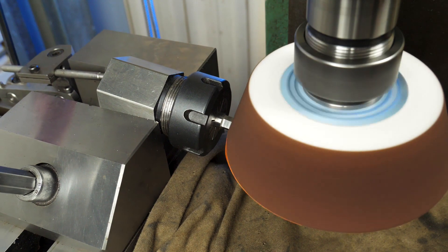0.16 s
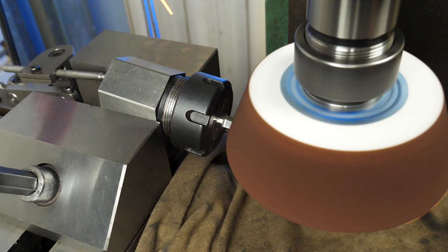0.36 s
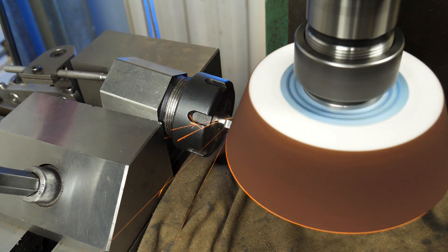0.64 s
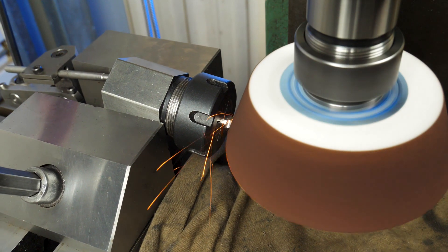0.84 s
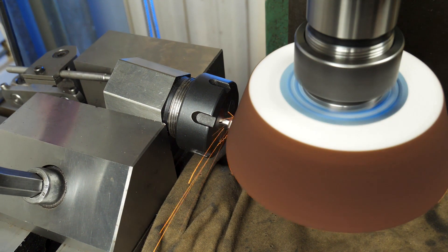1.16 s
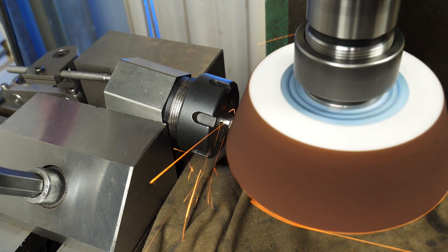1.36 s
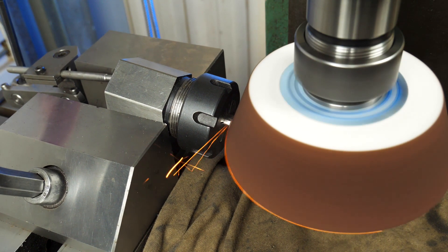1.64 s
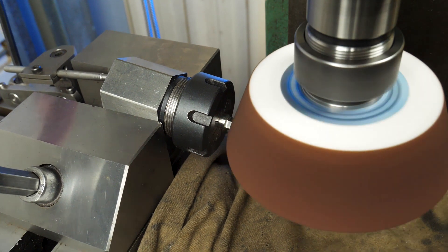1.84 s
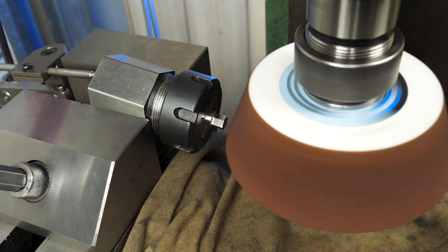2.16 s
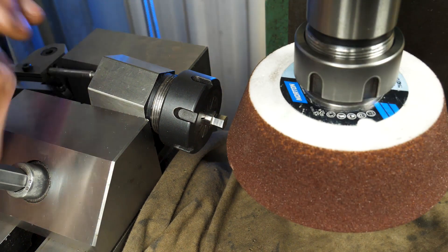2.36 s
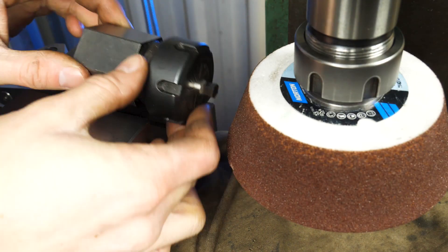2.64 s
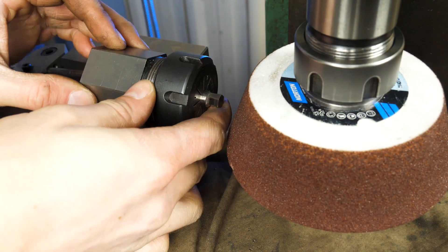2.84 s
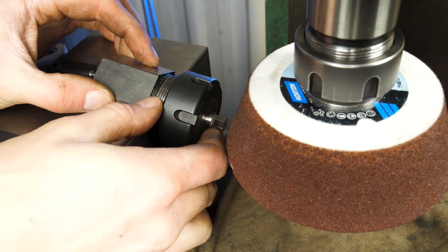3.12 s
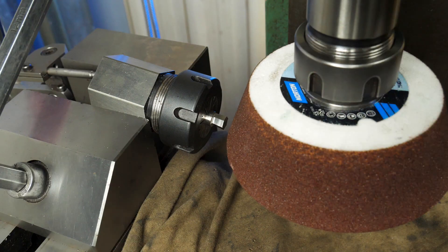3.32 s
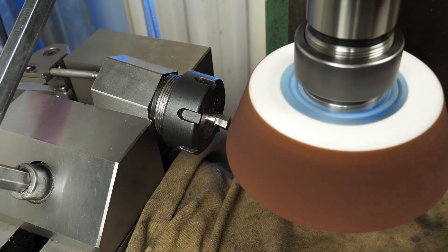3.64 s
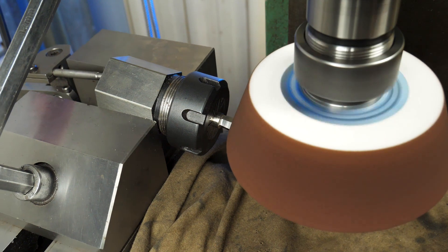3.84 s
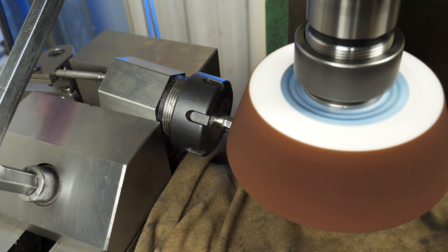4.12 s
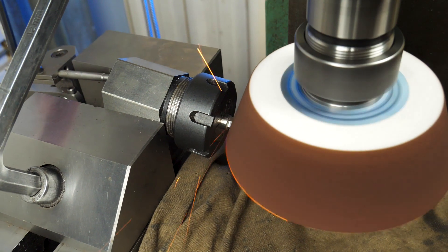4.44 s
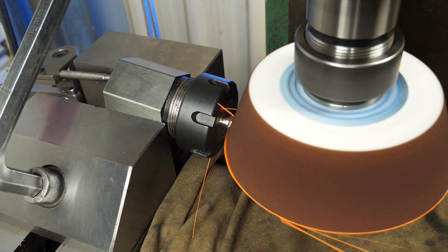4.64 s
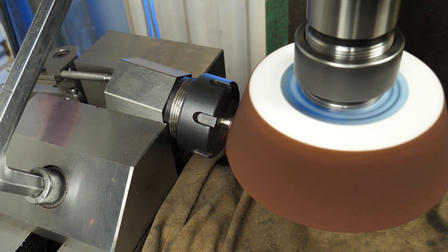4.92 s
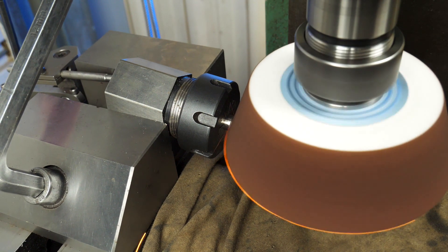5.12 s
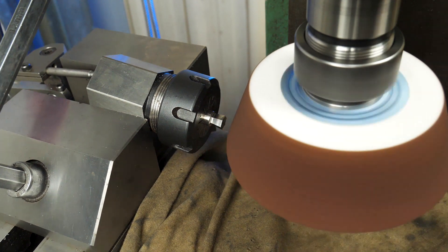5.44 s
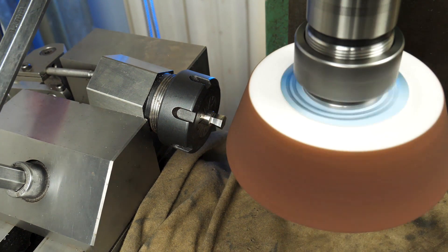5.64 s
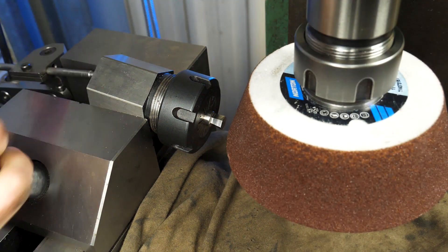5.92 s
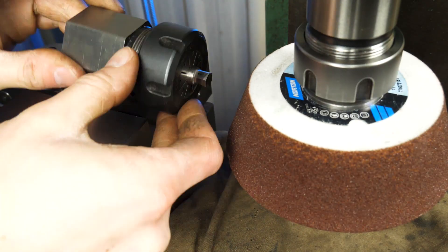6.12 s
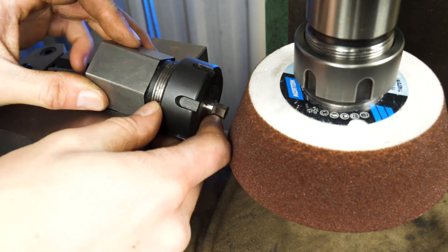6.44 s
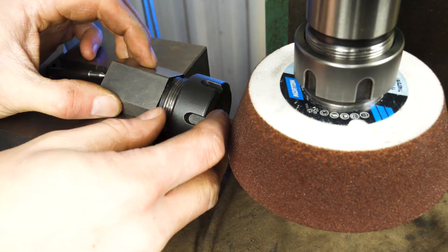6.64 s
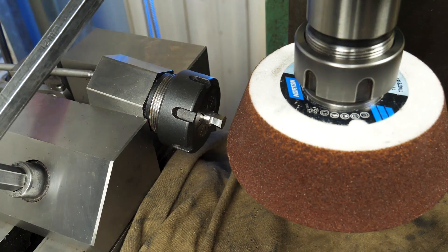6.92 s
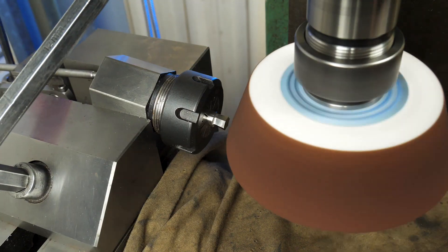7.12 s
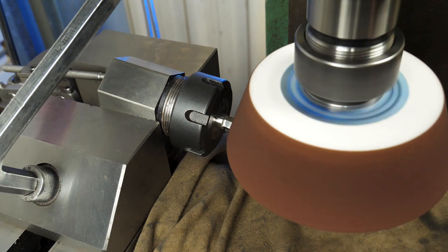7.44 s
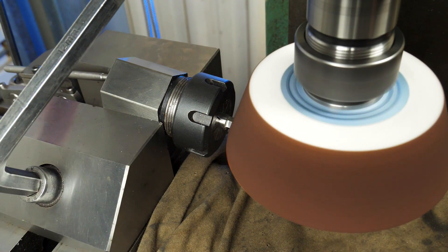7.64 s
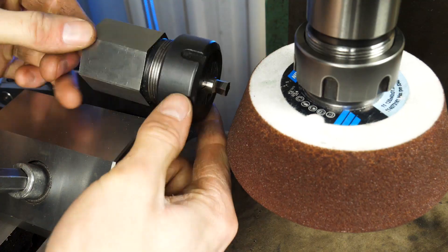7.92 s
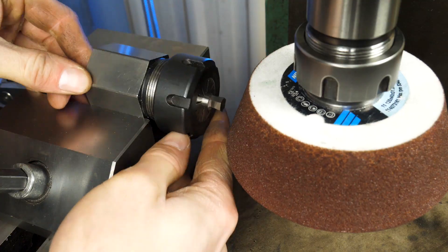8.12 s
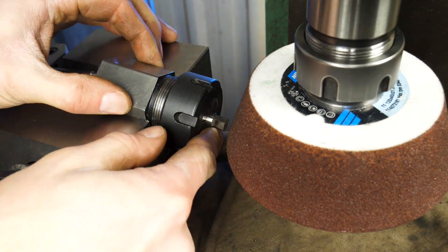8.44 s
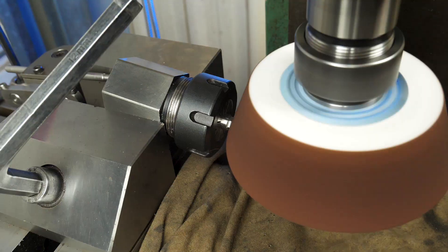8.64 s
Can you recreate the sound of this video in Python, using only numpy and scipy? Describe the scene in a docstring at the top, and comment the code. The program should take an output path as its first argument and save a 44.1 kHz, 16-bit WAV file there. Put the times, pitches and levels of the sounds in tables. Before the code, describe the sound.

A grinding wheel rushes and whines in four abruptly cut passes, running down with falling whistles, between quiet taps and scrapes of a steel block.

```python
"""Four passes of a cup wheel grinding a small steel bit, joined by splices; only the first is stereo.
From the start the wheel rushes as filtered noise, and gearbox and bearings whine as fluttering lines.
Heavy parts clunk (filtered noise bursts); late in passes one and two the spindle runs down, whistling.
After each of the first three passes hands turn a steel block and seat it in the vise: rough contact
forces tap, slide and ring the steel. Passes three and four are short; a quiet shop lies under it all."""
import sys
import numpy as np
from scipy import signal
from scipy.fft import rfft, irfft, next_fast_len
from scipy.io import wavfile
from scipy.ndimage import uniform_filter1d

SR = 44100
rng = np.random.default_rng(int(sys.argv[2]) if len(sys.argv) > 2 else 0)


def generate_wav(signal):
    """Clip the signal to [-1, 1] and save it as 16-bit WAV at the path in sys.argv[1]."""
    frames = np.transpose(np.atleast_2d(signal))
    scaled = np.clip(frames, -1, 1) * 32767
    pcm = np.round(scaled).astype(np.int16)
    wavfile.write(sys.argv[1], SR, pcm)


N = 386757
TIME = np.arange(N) / SR

# Grinding passes. Each row: start in seconds, end in seconds, fade-in in seconds, level in dB.
PASSES = [(-.005, 2.39, .004, -.2), (3.446, 5.874, .015, 0), (6.993, 7.913, .008, -.5),
          (8.552, 8.794, .001, .2)]
# Rush of the wheel before the resonances. Each row: frequency in Hz, then density in dB per Hz for
# the later passes, the mid of the first pass and the side of the first pass.
RUSH_SPECTRUM = [(40.0, -101.5, -74.5, -100.0), (130.0, -98.5, -87.5, -97), (290.0, -96.5, -82.5, -94),
                 (450.0, -90, -90, -89.5), (1100.0, -84, -86.5, -81), (1800.0, -79.5, -81, -82.5),
                 (2710, -82, -84, -83), (3500.0, -82.0, -82.5, -83.5), (5130, -77.5, -78, -79.5),
                 (7600, -76.0, -81.5, -76.5), (10100, -76.5, -79.0, -79.0), (13500, -79.5, -79.0, -82),
                 (14300.0, -73.0, -78, -73), (15500.0, -72.5, -75, -84)]
# Resonances of wheel, spindle head and vise. Each row: centre in Hz, width in Hz, lift in dB.
BODY_RESONANCES = [(540, 50, 4), (946, 73, 4.5), (1272, 39, 7), (1561, 35, 6), (2067, 55, 5),
                   (3000, 106, 3), (3925, 167, 5), (4690, 75, 2), (5890, 220, 3.5), (6410, 110, 4),
                   (7848, 200, 1.5), (8640, 230, 2), (11400, 500, 2)]
# Gear mesh, its shaft sidebands and bearing whine. Each row: frequency in Hz in the later passes,
# level in dB there, left and right level in dB in the first pass, roughness from 0 to 1.
WHINE_LINES = [(168, -72.5, -61, -65, .6), (184, -71, -73, -74, .5), (372, -67, -71, -67, .5),
               (505, -62.5, -58, -63, .6), (642, -61, -59, -60, .4), (702, -65.5, -66, -66, .4),
               (794, -47.5, -34.5, -47, .05), (841, -67, -61, -65, .4), (886, -62, -57, -60, .4),
               (978, -55.5, -53, -56, .5), (1314, -60.5, -56, -61, .9), (1497, -62, -68, -66, .4),
               (1541, -60.5, -59, -65, .6), (1588, -57, -50, -57, .3), (1771, -62, -59, -63, .4),
               (2048, -62, -60, -61, .9), (3149, -50.5, -57, -51, .2), (3176, -56, -55, -57, .2),
               (3943, -58, -57, -60, .8), (5038, -59.5, -56, -58, .4), (5960, -51, -46.5, -48, 1),
               (6302, -46.5, -52, -47, .6), (7096, -65, -48, -67, .3), (7870, -57, -60, -59, .9)]
# Feeding the bit. Each row: time of firmest pressure in seconds, half length in seconds,
# damping of the wheel in dB.
FEEDS = [(.9, .55, 3), (4.6, .4, 4), (7.95, .25, 2), (8.7, .3, 2)]
# Times in seconds at which the drive is switched off.
SWITCH_OFF_S = [2.125, 5.628]
# Run-down whistles before resonance and fade. Each row: frequency in Hz at full speed, level in dB.
WHISTLES = [(4800, -52), (3250, -53)]
# Times in seconds at which the drive takes hold.
ENGAGE_S = [3.466, 7.006]
# Dull clunks of heavy parts. Each row: time in seconds, level in dB, pitch in Hz, decay in seconds.
CLUNKS = [(.145, -44, 1100, .025), (.248, -38.5, 1050, .026), (.275, -42, 375, .065),
          (.855, -35, 950, .019), (1.65, -41, 1300, .009), (1.94, -42.5, 280, .06),
          (1.952, -27.5, 1000, .0065), (1.974, -36.5, 1000, .009), (2.191, -35.5, 1150, .005),
          (2.481, -45, 500, .0015), (2.545, -61, 450, .014), (3.616, -48, 376, .028),
          (5.964, -61, 500, .005), (6.552, -56, 700, .011)]
# Block taps the vise. Each row: time in seconds, level in dB, brightness in dB per octave.
TAPS = [(2.5636, -45.5, 5.5), (2.8569, -49, 0), (2.8782, -43.5, 1.3), (2.9655, -40.5, 1), (3.0021, -45, 3),
        (3.0604, -44.5, 1.5), (3.388, -52, -1), (6.042, -42.5, 6), (6.1424, -51.5, 1.5),
        (6.3884, -55.5, -4.5), (6.5482, -48, -1.3), (6.572, -52.5, -1.5), (6.6155, -43, 4.5),
        (6.777, -62, -2), (8.0836, -59, -3.5), (8.1209, -60, -2), (8.1544, -58, -4), (8.1994, -59, 0),
        (8.3927, -54, -.5)]
# Block slides on the jaws. Each row: time in seconds, length in seconds, level in dB.
SLIDES = [(2.667, .032, -63), (3.055, .008, -55), (5.847, .026, -65), (6.118, .026, -56.5),
          (6.3768, .012, -64), (6.509, .04, -60), (7.916, .018, -57), (8.339, .015, -54.5),
          (8.373, .018, -55), (8.528, .022, -61.5)]
# Steel-on-steel contact spectrum. Each row: frequency in Hz, relative level in dB per Hz.
CONTACT_SPECTRUM = [(100, -11.5), (300, -12.5), (1000, -5.5), (1600, -5.5), (3300, -4), (6000, -1),
                    (9500, -1.5), (13000, -2), (16000, -9)]
# Ringing of block and vise. Each row: frequency in Hz, relative level in dB, t60 in seconds.
STEEL_MODES = [(520, -3.5, .08), (980, 0, .06), (1306, -3, .06), (2030, -2.5, 0.083), (2900, -7, 0.034),
               (3575, -10.5, .04), (4334, -8.5, 0.044), (5739, -4, .02), (7585, -13, .04), (8775, -7, .04)]
# Spans in which hands shift the block. Each row: start in seconds, end in seconds.
FIDDLING = [(2.43, 2.7), (2.88, 3.39), (5.91, 6.92), (7.92, 8.4)]
# Workshop background. Each row: frequency in Hz, mean density in dB per Hz.
SHOP_SPECTRUM = [(25, -100), (60, -110), (130, -114), (280, -109), (900, -112), (1800, -118), (5000, -124),
                 (9500, -122), (12500, -128), (14000, -136), (16000, -140)]
# Rumble and faint hiss of the first pass before a small gain. Each row: frequency in Hz,
# density in dB per Hz.
RUMBLE_SPECTRUM = [(15, -70.5), (40, -74), (70, -81), (130, -83.5), (320, -87.5), (500, -88), (1200, -102),
                   (6000, -108), (16000, -112)]
# Splice thumps, each after a short silence. Each row: time in seconds, level in dB.
SPLICES = [(2.429, -35.5), (3.429, -45.5), (5.909, -36), (6.989, -45)]

BRAKE_S, LOUDNESS_POWER = .18, 1.85  # time to standstill; amplitude goes as speed to this power
FREE_RING_DB = 1  # wheel's middle range with nothing pressed on it
LINGER_HZ, LINGER_DB, LINGER_T60_S = 794, -67, 1.1  # gear tone after switch-off
ENGAGE_DB, RELEASE_DB, DRIVE_HZ, DRIVE_DECAY_S = -33, -46, 760, .012
CLUNK_RISE = .6  # build-up as a share of the decay
BREAKAWAY, BREAKAWAY_S = 1, .003  # extra force at the start of a slide, and its decay
SOFT_BRIGHTNESS_DB_PER_OCTAVE = -3.5  # slides, ticks and rustle
TICKS_PER_S, TICK_DB, TICK_SPREAD_DB = 4, -70, 2
RUSTLE_DB, RUSTLE_SWELL_DB, RUSTLE_RATE_HZ = -114, 2.5, 9  # gain on the contact spectrum; its swells
SILENCE_S, EDGE_HZ = .032, 15900  # gap before each splice; band limit


def amp(db):
    """Decibels to gain."""
    return 10 ** (np.asarray(db) / 20)


def evened(x):
    """Scales to rms 1."""
    return x / np.sqrt(np.mean(x ** 2) + 1e-20)


def read(points, hz, column=1):
    """Reads a spectrum on a log-frequency axis."""
    points = np.asarray(points)
    return np.interp(np.log(hz + 1), np.log(points[:, 0] + 1), points[:, column])


def add(mix, start_s, sound):
    """Lays a sound into the mix at a time."""
    part = mix[max(round(start_s * SR), 0):][:len(sound)]
    part += sound[:len(part)]


def bins(size):
    """Frequencies in Hz of a spectrum of so many samples."""
    return np.fft.rfftfreq(size, 1 / SR)


def noise(density_db):
    """Noise with a spectrum given as a function, in dB per Hz."""
    size = next_fast_len(N, True)
    spectrum = rfft(rng.standard_normal(size)) * amp(density_db(bins(size)))
    return irfft(spectrum, size)[:N] * np.sqrt(SR / 2)


def wander(rate_hz):
    """Random curve of rms 1, straight between random points, changing at about the given rate."""
    values = rng.standard_normal(8000)
    return evened(np.interp(TIME * 2 * rate_hz, np.arange(len(values)), values))


def machine(ring_hz=1700, ring_octaves=.45, treble_hz=9000, dulling=.5):
    """Rush and whine, gated by passes; slowing fades and dulls them, feeding damps the middle range."""
    first = TIME < PASSES[0][1]
    mid, side = rush(column=2), rush(column=3)
    stereo = np.array([mid + side, mid - side])
    sound = np.where(first, stereo, rush(column=1)) + whine(first)

    size = next_fast_len(N, True)
    hz, spectrum = bins(size), rfft(sound, size)
    middle_band = np.exp(-.5 * (np.log2((hz + 1) / ring_hz) / ring_octaves) ** 2)
    middle = irfft(spectrum * middle_band, size)[:, :N]
    treble = irfft(spectrum * hz ** 4 / (hz ** 4 + treble_hz ** 4), size)[:, :N]

    damping_db = sum(db * np.exp(-((TIME - s) / half_s) ** 2) for s, half_s, db in FEEDS)
    ring_gain = amp(FREE_RING_DB - damping_db)
    sound = sound + middle * (ring_gain - 1) + treble * (speed() ** dulling - 1)
    gate = np.zeros(N)
    for start_s, end_s, fade_s, db in PASSES:
        gate += amp(db) * np.clip((TIME - start_s) / fade_s, 0, 1) * (TIME < end_s)
    return sound * gate * speed() ** LOUDNESS_POWER


def rush(column, ripple_db=2.62, ripple_hz=22, flutter_db=0.7):
    """Air and grit hiss through the broad resonances and the many small modes of the machine."""
    grid_hz = np.arange(0, SR / 2, 8)
    ripple = np.interp(grid_hz / ripple_hz, np.arange(len(grid_hz)), rng.standard_normal(len(grid_hz)))
    colour_db = read(RUSH_SPECTRUM, grid_hz, column) + body_db(grid_hz) + ripple_db * ripple
    return noise(lambda hz: np.interp(hz, grid_hz, colour_db)) * amp(flutter_db * wander(25))


def whine(first, drift=0.00048, first_faster=.002, port_phase_rad=2.54, stop_s=0.0064, coast_db=-14):
    """Lines share one speed drift; rough ones flutter and widen; all drop when the drive lets go."""
    turns = np.cumsum(1 + first_faster * first + drift * wander(8)) / SR
    driven = np.maximum(np.exp(-coasting() / stop_s), amp(coast_db))
    out, split = np.zeros((2, N)), first.sum()
    for hz, later_db, left_db, right_db, rough in WHINE_LINES:
        rate_hz = 12 + hz * .003
        cycles = hz * turns + rng.random()
        angle = (2 * np.pi * (cycles - np.floor(cycles))).astype("float32")
        steady = 1 + rough * wander(rate_hz)
        across = rough * wander(rate_hz)
        size = np.sqrt(2 / (1 + 2 * rough ** 2))
        line = size * (steady * np.cos(angle) + across * np.sin(angle))
        # the two ports of the stereo microphone hear all but the lowest lines out of step
        late = angle[:split] - float(port_phase_rad * min(hz / 750, 1))
        late_line = size * (steady[:split] * np.cos(late) + across[:split] * np.sin(late))
        out[0, :split] += amp(left_db) * line[:split]
        out[1, :split] += amp(right_db) * late_line
        out[:, split:] += amp(later_db) * line[split:]
    return out * driven


def body_db(hz):
    """Lift that the resonances of the machine give to a frequency."""
    return sum(db * np.exp(-.5 * ((hz - centre_hz) / width_hz) ** 2)
               for centre_hz, width_hz, db in BODY_RESONANCES)


def coasting():
    """Seconds since switch-off, until the pass ends; zero otherwise."""
    since_s = np.zeros(N)
    for start_s, end_s, _, _ in PASSES:
        for off_s in SWITCH_OFF_S:
            if start_s < off_s < end_s:
                since_s += (TIME - off_s) * ((TIME > off_s) & (TIME < end_s))
    return since_s


def speed():
    """Spindle speed as a share of full speed; the brake takes it down at an even rate."""
    return np.clip(1 - coasting() / BRAKE_S, 0, 1)


def run_down(rough=.065, flutter_db=4.5, fade_power=1.5, lowest_hz=1100, onset_s=.012, first_db=-7):
    """Ragged whistles fall with speed, swell at resonances, die near a lowest pitch; gear tone lingers."""
    since_s, share = coasting(), speed()
    out = amp(LINGER_DB - 60 * since_s / LINGER_T60_S) * np.sin(2 * np.pi * LINGER_HZ * TIME)
    for full_hz, db in WHISTLES:
        hz = full_hz * share
        turns = np.cumsum(hz * (1 + rough * wander(396))) / SR
        fade = share ** fade_power * hz ** 8 / (hz ** 8 + lowest_hz ** 8)
        level = amp(db + body_db(hz) + flutter_db * wander(60))
        out += level * fade * np.sin(2 * np.pi * turns)
    onset = np.minimum(since_s / onset_s, 1)
    return np.sqrt(2) * out * onset * amp(first_db * (TIME < PASSES[0][1]))


def clunks(octaves=.55, skirt_db=-14, grain_db=3.5):
    """Short dull noise rattles of heavy parts and of the drive, each centred on one pitch."""
    out, t = np.zeros(N), np.arange(16384) / SR - .12
    engage = [(s, ENGAGE_DB, DRIVE_HZ, DRIVE_DECAY_S) for s in ENGAGE_S]
    release = [(s, RELEASE_DB, DRIVE_HZ, DRIVE_DECAY_S) for s in SWITCH_OFF_S]
    for s, db, hz, decay_s in engage + release + list(CLUNKS):
        distance = np.log2((bins(len(t)) + 1) / hz)
        colour = np.exp(-.5 * (distance / octaves) ** 2) + amp(skirt_db) / (1 + (distance / 2) ** 4)
        shape = np.exp(np.where(t < 0, t / CLUNK_RISE, -t) / decay_s)
        grain = amp(grain_db * evened(uniform_filter1d(rng.standard_normal(len(t)), size=90)))
        rattle = irfft(rfft(rng.standard_normal(len(t)) * grain) * colour)
        add(out, s + t[0], amp(db) * evened(rattle * shape) * np.sqrt(np.mean(shape ** 2)))
    return out


def handling(snap_s=0.00081, chatter_s=0.0048, chatter=.35, graze=.06, graze_s=.003, stick_db=3.5):
    """Slides break away into a run of tiny slips; taps graze, snap and chatter briefly."""
    out, lead_s = np.zeros(N), .005
    t = np.arange(8192) / SR - lead_s
    age = abs(t)
    for s, length_s, db in SLIDES:
        touching = (t > 0) & (t < length_s)
        slips = amp(stick_db * evened(uniform_filter1d(rng.standard_normal(len(t)), size=60)))
        force = touching * (slips + BREAKAWAY * np.exp(-age / BREAKAWAY_S))
        slide = contact(force, SOFT_BRIGHTNESS_DB_PER_OCTAVE)
        add(out, s - lead_s, amp(db) * slide / slide[touching].std())

    struck = np.exp(-age / snap_s) + chatter * np.exp(-age / chatter_s)
    force = np.where(t > 0, struck, graze * np.exp(-age / graze_s))
    for s, db, brightness_db in list(TAPS) + ticks():
        tap = contact(force, brightness_db)
        strike = tap[(t > 0) & (t < .01)]
        add(out, s - lead_s, amp(db) * tap / strike.std())
    return out


def contact(force, brightness_db, ring_db=-13, room_db=-18, room_t60_s=0.16, room_hz=7000,
            glance_db=1.3, spot_db=2.5, top_hz=11000):
    """A rough contact force cracks, rings the steel and stirs a little of the room."""
    t, hz = np.arange(len(force)) / SR, bins(len(force))
    tilt = amp(brightness_db * np.log2(np.clip(hz, 1000, top_hz) / top_hz))
    # each spot that is struck favours other resonances
    spot = amp(spot_db * np.interp(hz, np.linspace(0, SR / 2, 64), rng.standard_normal(64)))
    grit = evened(force * rng.standard_normal(len(t)))
    modes = sum(amp(db - 60 * t / t60_s) * np.sin(2 * np.pi * (mode_hz * t + rng.random()))
                for mode_hz, db, t60_s in STEEL_MODES)
    ring = evened(signal.fftconvolve(grit, modes)[:len(t)])
    room = evened(rng.standard_normal(len(t)) * amp(-60 * t / room_t60_s) * np.cumsum(force))
    heard = rfft(grit) + amp(room_db) * rfft(room) / np.hypot(1, hz / room_hz)
    crack = evened(irfft(heard * spot * tilt * amp(read(CONTACT_SPECTRUM, hz))))
    # a bright, glancing tap rings the steel less than a dull, square one
    return crack + amp(ring_db - glance_db * max(brightness_db, 0)) * ring


def ticks():
    """Faint taps, loosely spread over the time that the hands are busy: rows like those of TAPS."""
    rows = []
    for start_s, end_s in FIDDLING:
        for slot_s in np.arange(start_s, end_s, 1 / TICKS_PER_S):
            s = min(slot_s + rng.random() / TICKS_PER_S, end_s)
            db = TICK_DB + TICK_SPREAD_DB * rng.uniform(-1, 1)
            rows.append((s, db, SOFT_BRIGHTNESS_DB_PER_OCTAVE))
    return rows


def rustle(corner_hz=1500, edge_s=.03):
    """Fingers rub softly over the steel: dulled contact noise in uneven swells."""
    busy = sum(np.clip(np.minimum(TIME - start_s, end_s - TIME) / edge_s + 1, 0, 1)
               for start_s, end_s in FIDDLING)

    def rub_db(hz):
        """Contact spectrum, tilted above the corner."""
        octaves = np.log2(np.maximum(hz / corner_hz, 1))
        return read(CONTACT_SPECTRUM, hz) + SOFT_BRIGHTNESS_DB_PER_OCTAVE * octaves

    return noise(rub_db) * busy * amp(RUSTLE_DB + RUSTLE_SWELL_DB * wander(RUSTLE_RATE_HZ))


def background():
    """Quiet shop noise of wandering level, and a low rumble during the first pass."""
    shop = noise(lambda hz: read(SHOP_SPECTRUM, hz)) * amp(1.0 * wander(7.7))
    rumble = noise(lambda hz: read(RUMBLE_SPECTRUM, hz)) * (TIME < PASSES[0][1]) * amp(0.5)
    return shop + rumble


def scene():
    """The machine, with everything else in the centre."""
    return machine() + background() + run_down() + rustle() + clunks() + handling()


def record(dry, settle_s=0.027):
    """Each splice is a short silence, then a step that settles as a soft thump; then the band limit."""
    out = dry.copy()
    for s, db in SPLICES:
        audible = (TIME < s - SILENCE_S) | (TIME >= s)
        thump = amp(db) * (TIME >= s) * np.exp(-abs(TIME - s) / settle_s)
        out = out * audible - thump
    lowpass = signal.firwin(511, EDGE_HZ, window=("kaiser", 9), fs=SR)
    return signal.oaconvolve(out, lowpass[None], "same")


dry = scene()
out = record(dry)
generate_wav(out)
```